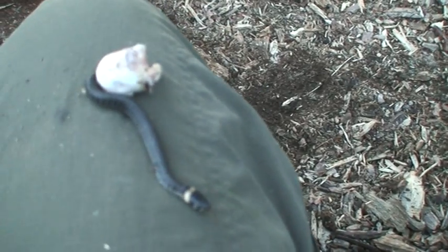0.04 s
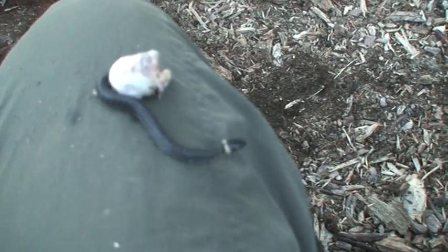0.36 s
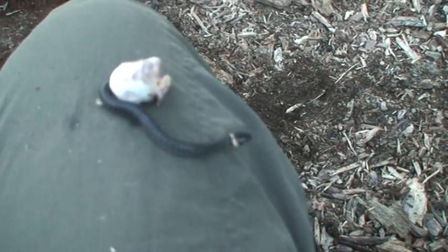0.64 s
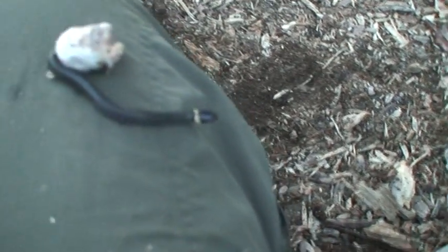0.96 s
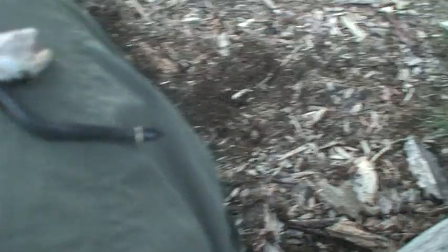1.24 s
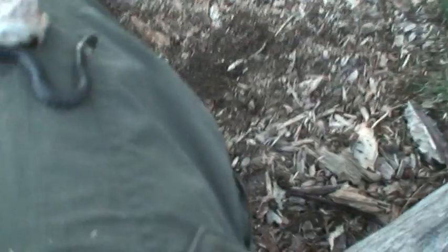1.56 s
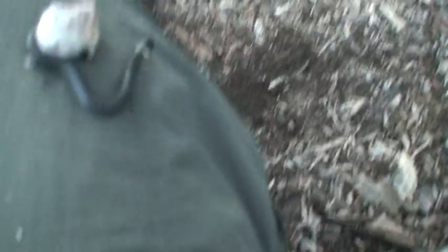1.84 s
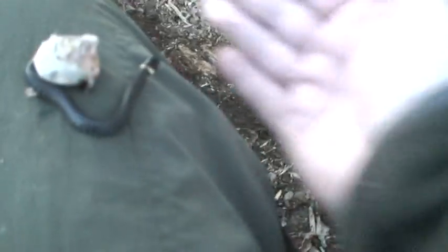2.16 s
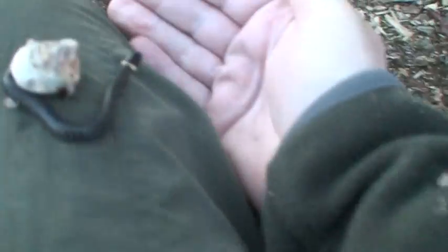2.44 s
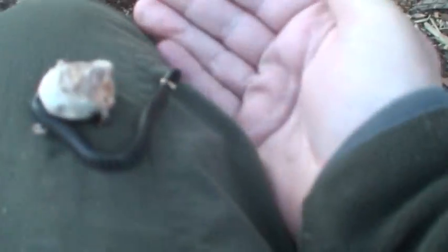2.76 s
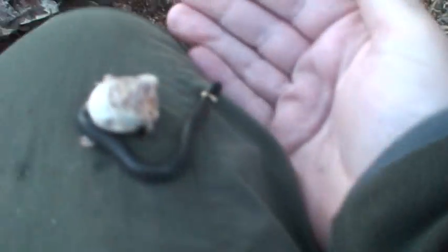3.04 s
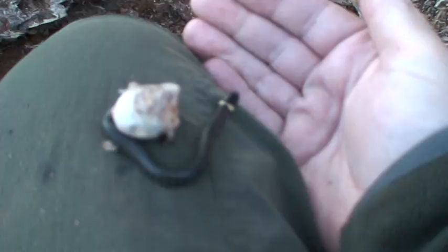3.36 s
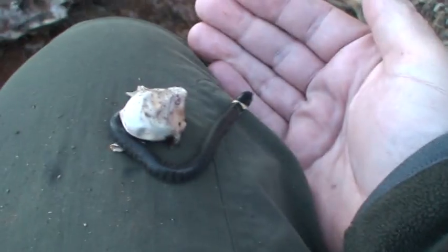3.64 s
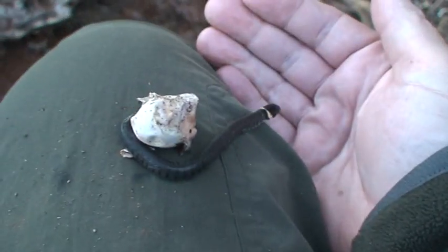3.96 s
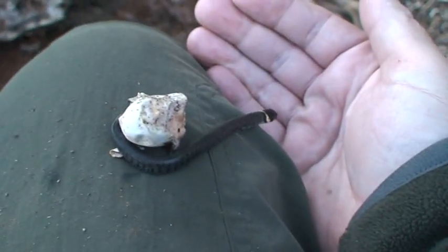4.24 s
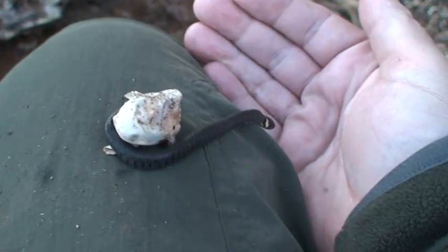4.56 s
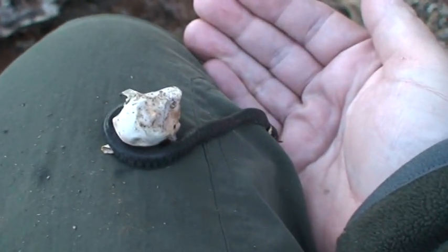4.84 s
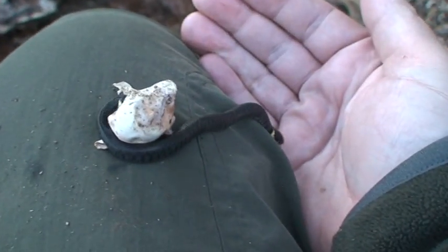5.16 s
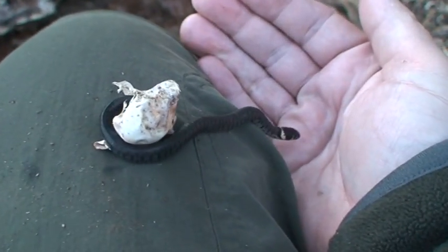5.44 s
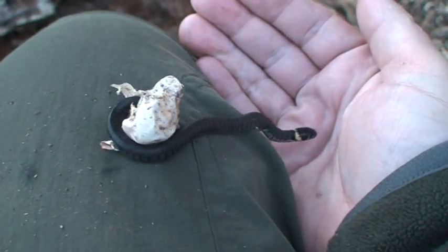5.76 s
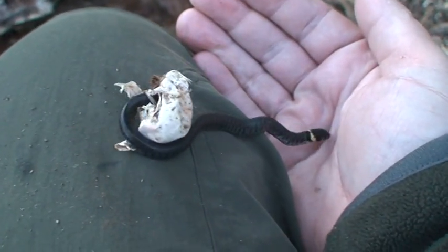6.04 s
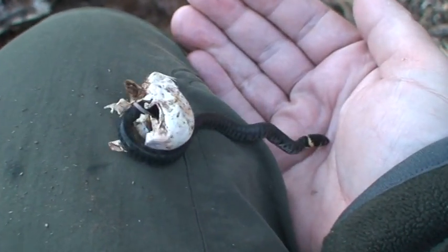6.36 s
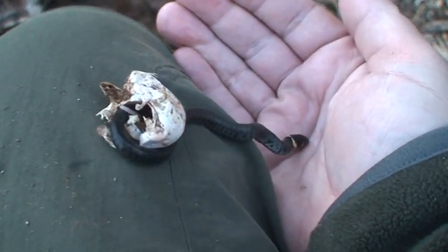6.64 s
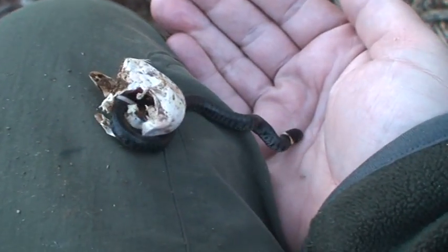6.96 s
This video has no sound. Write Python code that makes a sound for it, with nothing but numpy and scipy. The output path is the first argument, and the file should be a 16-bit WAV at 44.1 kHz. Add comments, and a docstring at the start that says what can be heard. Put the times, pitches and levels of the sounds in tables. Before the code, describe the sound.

A quiet outdoor background runs for all seven seconds: low, far traffic rumble, soft air and microphone hiss, and a small camera's own faint, thin tones. A distant machine whines on two wavering pitches, slowly sinking and fading. At about 1.5 seconds, fingers shift their grip on the camera, right at the microphone: a quick flurry of hollow plastic knocks, thuds and scrapes, with tiny bright crackles and cloth rubbing. The loudest knock comes at about 1.9 seconds. A few lighter taps and soft sleeve brushes trail on until around 2.6 seconds. At about 2.7 seconds the plastic housing gives one sharp, dry click, followed by a slight rub at 3 seconds. After that the background continues, the rumble swelling gently near 4 seconds and easing off. Two faint fabric brushes come at about 6.4 and 6.9 seconds as the whine dwindles.

```python
"""Outdoors, far traffic rumbles and a distant machine whines, slowly running down, under a small camera's
own thin tones and hiss. At 1.5 s someone shifts their grip on it: fingers knock and scrape, the plastic
housing thuds and rings, its seam crackles and a sleeve brushes past. At 2.7 s a panel snaps over with one
sharp click. The background carries on, the whine sinking and fading, with two faint brushes after 6 s."""
import sys
import numpy as np
from scipy import signal
from scipy.fft import rfft, irfft
from scipy.io import wavfile
from scipy.ndimage import uniform_filter1d

SR = 44100
rng = np.random.default_rng(int(sys.argv[2]) if len(sys.argv) > 2 else 0)


def store_pcm(level_fs):
    """Save levels as 16-bit WAV."""
    pcm = np.round(np.clip(level_fs, -1, 1) * 32767).astype(np.int16)
    wavfile.write(sys.argv[1], SR, np.atleast_2d(pcm).T)


N = 313551
TIME = np.arange(N) / SR
HIT_SIZE, LEAD_SIZE = 4096, 256  # samples in one hit, and in its pre-roll
HIT_TIME = np.arange(HIT_SIZE) / SR
HIT_HZ = np.maximum(np.fft.rfftfreq(HIT_SIZE, 1 / SR), 1)
HIT_GAIN = np.sqrt(SR / 100)  # a hit's level is its rms as if packed into 10 ms
LEFT_RIGHT = np.array([[.5], [-.5]])  # splits a pan or a delay between the two microphone ports

# Fingers on the housing. Each row: start in seconds, thud, ring, clack and tick levels in dB, ring pitch
# and clack centre in Hz, clack width in octaves, scrape decay in seconds, left minus right in dB.
KNOCKS = [(1.535, -39, -51, -61, -75, 614, 750, 0.76, 0.0013, -2),
          (1.5654, -37.5, -40, -43, -49, 576, 1500, 0.69, 0.0042, 1.5),
          (1.5805, -41, -35, -40.5, -53, 616, 1050, 0.81, 0.0013, -1),
          (1.623, -51, -58, -49, -62, 596, 1600, .3, 0.0042, 5),
          (1.644, -56, -47, -46.5, -68, 640, 1200, 0.67, 0.013, 1),
          (1.6629, -31, -27, -29, -38.5, 621, 1210, 0.44, .0003, -1),
          (1.674, -34.5, -57, -49, -57, 597, 1300, 0.64, 0.013, -1),
          (1.6982, -47, -48, -48, -70, 600, 1300, 0.37, 0.0009, -1),
          (1.7192, -58, -44, -47, -62, 606, 1400, 0.53, 0.0018, 6),
          (1.7332, -44, -40, -42.5, -56, 608, 1300, 0.58, .001, -2),
          (1.7404, -56, -54, -36.5, -48, 580, 2200, 0.18, 0.00032, -1),
          (1.7591, -32.5, -34.5, -34.5, -70, 608, 1000, 0.69, 0.00023, 2),
          (1.7915, -40, -36, -63, -75, 573, 800, .6, 0.0016, -8),
          (1.7963, -32, -37, -50, -75, 552, 750, .5, .001, -1),
          (1.8193, -47, -30.5, -43, -54, 555, 990, 0.53, 0.0011, -6),
          (1.8314, -45, -37.5, -36.5, -41, 594, 2100, 0.46, 0.00036, 3),
          (1.846, -37, -37, -37, -52, 577, 880, 0.68, 0.0025, -1),
          (1.863, -45, -41, -51, -74, 590, 1500, 0.57, 0.0033, -4),
          (1.8805, -43, -39, -38.5, -61, 590, 1400, 0.77, 0.0056, 4),
          (1.8923, -20, -25.5, -25.5, -44, 568, 1050, 0.71, 0.00036, -2.5),
          (1.9084, -41, -25.5, -40, -62, 573, 1250, 0.67, 0.0017, -4),
          (1.926, -38, -45, -36.5, -60, 607, 1440, 0.72, 0.0037, 2),
          (2.016, -45, -46, -44.5, -58, 580, 1200, 0.79, 0.0025, 2),
          (2.044, -50, -41, -48, -59, 582, 1300, 0.87, .007, 1),
          (2.1635, -58, -45, -49.5, -72, 630, 870, 0.64, 0.00043, 0),
          (2.4685, -63, -42, -48.5, -65, 584, 1200, 1.13, 0.0011, -3),
          (2.497, -57, -58, -60, -76, 595, 1980, 0.54, 0.001, 0)]
# The panels' clack. Each row: mode pitch in Hz, time to fall 60 dB in seconds, relative level in dB.
HOUSING_MODES = [(816, 0.034, 5.5), (855, 0.052, 5.5), (1014, 0.017, 9.5), (1096, .035, 1.5),
                 (1412, 0.051, 2.5), (1550, 0.015, 0), (1780, 0.062, 3), (1900, 0.026, 2), (2250, 0.018, 1),
                 (2390, 0.031, -8), (2790, 0.03, 6.5), (2960, 0.02, -2), (3830, 0.026, 11)]
# The fingertip's tick. Each row: frequency in Hz, relative level in dB.
TICK_EQ = [(2200, 7.5), (3800, -2), (4700, -9), (5500, 1), (6650, -11), (8400, -12), (9500, -20),
           (12000, -27), (16000, -37)]
# The click's attack. Each row: frequency in Hz, relative level in dB.
SNAP_EQ = [(400, -17), (800, -12), (1080, 5), (1400, 6.5), (2100, 1), (2800, -5), (4600, -5), (5400, -19),
           (6500, -36), (7200, -6), (8200, -14), (9100, -38), (10500, -33), (16000, -45)]
# The click's ring. Each row: mode pitch in Hz, time to fall 60 dB in seconds, relative level in dB.
CLICK_MODES = [(261, .05, -10), (564, 0.06, 2), (800, 0.065, -9), (1100, 0.049, 2), (1360, 0.039, 0),
               (1550, .032, -6), (1710, 0.049, 0), (1857, 0.036, -6), (2240, .03, 1), (2400, 0.037, -9),
               (3130, 0.021, -9)]
# The click's dry rattle. Each row: frequency in Hz, relative level in dB.
CHATTER_EQ = [(500, -1), (1000, 6), (2200, -1), (3200, -4), (5200, -19), (6500, -30), (7900, -23),
              (9500, -33), (16000, -45)]
# The seam under the hardest presses. Each row: start in seconds, level in dB, decay in seconds.
SEAM_CRACKS = [(1.5666, -54, .004), (1.6636, -43.5, 0.0012), (1.7341, -56, .002), (1.7403, -54, .0015),
               (1.8188, -56, .0018), (1.8323, -41.5, 0.0013), (1.8812, -60, .0015), (1.892, -48, 0.0014),
               (1.929, -54, 0.0028)]
# The seam's bright grit. Each row: frequency in Hz, relative level in dB.
SEAM_EQ = [(1800, 5), (3000, 1), (4000, 8), (4900, 6), (6300, -4), (8000, 0), (9800, -11), (12000, -19),
           (16000, -24)]
# Strokes of cloth and skin. Each row: peak time and length in seconds, rub and thread hiss levels in dB.
BRUSHES = [(1.579, 0.054, -49.5, -66.5), (1.645, 0.054, -58.5, -73), (1.679, 0.028, -51, -67),
           (1.734, .02, -56, -68), (1.828, 0.11, -56.5, -72), (1.9, 0.045, -58, -75),
           (2.29, 0.035, -57, -63), (2.337, 0.1, -61, -71), (2.487, 0.16, -61, -73), (2.615, 0.1, -62, -74),
           (2.98, 0.12, -64, -70.5), (6.353, .045, -62.5, -73), (6.907, .09, -69, -79)]
# The body of the rub. Each row: frequency in Hz, relative level in dB.
CLOTH_EQ = [(400, -27), (900, 8), (1800, 7.5), (3500, 0), (5000, -6.5), (6500, -11), (9000, -23),
            (16000, -32)]
# The threads' sizzle. Each row: frequency in Hz, relative level in dB.
THREAD_EQ = [(4000, -12), (7000, -6), (8200, 5), (9400, 2.5), (10700, -4), (12500, -3), (16000, -18)]
# Swells of a low rumble, the biggest near 4 s. Each row: time in seconds, level before its trim in dB.
RUMBLE_LEVELS = [(0.0, -46), (1.2, -51.5), (2.3, -49.5), (2.6, -52), (3.2, -47), (3.4, -49.5), (4.1, -44),
                 (4.8, -52), (5.1, -49.5), (6.5, -54), (7.1, -52)]
# The rumble's weight. Each row: frequency in Hz, relative level in dB.
RUMBLE_EQ = [(30, -32), (70, -5.5), (120, 0.5), (175, -0.5), (240, -5), (320, -14), (500, -21.5)]
# Far tyre wash. Each row: frequency in Hz, relative level in dB.
TYRE_EQ = [(200, -3.5), (310, -10.5), (420, -2.5), (530, -4.5), (620, -0.5), (730, -15.5), (1000, -18),
           (1600, -31)]
# The machine's upper whine, carried over on moving air. Each row: time in seconds, level in dB.
UPPER_WHINE_LEVELS = [(0, -49.5), (0.17, -46), (0.58, -59.5), (0.78, -53.5), (0.98, -61.5), (1.3, -53.5),
                      (2.2, -50.5), (2.38, -54), (2.52, -52), (2.9, -55.5), (3.25, -53.5), (3.5, -58.5),
                      (4.02, -61.5), (4.22, -55), (4.92, -55), (5.2, -60), (6.28, -60.5), (7.1, -67.5)]
# Its lower whine. Each row: time in seconds, level in dB.
LOWER_WHINE_LEVELS = [(0, -52.5), (0.5, -66.5), (0.82, -56.5), (1, -62.5), (1.35, -57.5), (2.1, -62),
                      (2.35, -54), (2.75, -70), (3, -63), (3.4, -69), (4.6, -72.5), (5, -58.5), (5.5, -78),
                      (7.1, -75)]
# The bed of air and microphone hiss. Each row: frequency in Hz, relative level in dB.
AIR_EQ = [(15, -17), (30, 0), (70, 6), (130, -13), (350, -11), (700, -12.5), (1000, -16), (1500, -21),
          (2200, -23.5), (3000, -30), (6000, -35.5), (9800, -39.5), (12500, -37.5), (16000, -42.5)]
# The camera's own whistle. Each row: pitch in Hz, level in dB.
CAMERA_TONES = [(393, -66), (1211, -67), (2385, -81.5)]
# Stereo width of the sound. Each row: frequency in Hz, side minus mid in dB.
STEREO_WIDTH = [(30, -22), (80, -28), (200, -21), (380, -13), (700, -8), (1300, -2.5), (2400, -2.5),
                (8000, -2), (11000, -6), (13000, -39)]


def knock(thud_db, ring_db, clack_db, tick_db, ring_hz, clack_hz, octaves, scrape_s, pan_db,
          thud_hz=260, thud_t60_s=0.055, ring_t60_s=0.052, slip_s=0.001, port_lag_s=.00009):
    """One touch: the finger catches and slips, the housing thuds, rings and clacks, the contact ticks."""
    # the longer the scrape, the more of the push comes as tiny slips after the first catch
    slips = unit_power(rfft(rng.standard_normal(HIT_SIZE) ** 3 * np.exp(-HIT_TIME / scrape_s)))
    push = 1 + scrape_s / slip_s * slips
    thud = body_mode(thud_hz, thud_t60_s)
    ring = body_mode(ring_hz, ring_t60_s)
    # the place of contact picks a band of the panels and favours some of their modes
    band = 1 / (1 + (np.log2(HIT_HZ / clack_hz) / octaves / 2) ** 2) ** 4
    panels = panel_ring(HOUSING_MODES, scatter_db=5.5)
    # a first wave runs ahead of the ringing and reaches one port before the other
    first_wave = port_delay(port_lag_s * rng.uniform(-1.28, 1))
    clack = unit_power(band * panels) + 0.73 * unit_power(band * first_wave)
    # the tick is one sharp snap with a duller, gritty tail
    tail = burst(decay_s=0.0027) / (1 + (HIT_HZ / 13000) ** 2)
    tick_eq = eq(TICK_EQ)
    tick = unit_power(first_wave * tick_eq) + undb(3) * unit_power(tail * tick_eq)
    chirp = panel_chirp(spread_s=0.001824)
    layers = ((thud_db, thud), (ring_db, ring), (clack_db, clack * chirp), (tick_db, tick * chirp))
    spectrum = sum(undb(db) * unit_power(push * layer) for db, layer in layers)
    fades = signal.windows.tukey(HIT_SIZE, LEAD_SIZE / HIT_SIZE)
    return hit_wave(spectrum) * fades * undb(pan_db * LEFT_RIGHT)


def fingers():
    """The grip shifts in a quick flurry of knocks on the housing."""
    return sum(place(knock(*touch), start_s) for start_s, *touch in KNOCKS)


def panel_click(start_s=2.7468, snap_db=-30.5, ring_db=-30.5, chatter_db=-35.5,
                lag_s=0.000211, lag_above_hz=2530):
    """A stressed panel snaps over, chatters dryly against its seat and rings briefly."""
    treble = HIT_HZ ** 4 / (HIT_HZ ** 4 + lag_above_hz ** 4)
    snap = unit_power(eq(SNAP_EQ) * port_delay(lag_s * treble))  # the top end hits the right port first
    ring = unit_power(panel_ring(CLICK_MODES))
    chatter = unit_power(burst(decay_s=0.006) * eq(CHATTER_EQ))
    click = undb(snap_db) * snap + undb(ring_db) * ring + undb(chatter_db) * chatter
    return place(hit_wave(click * panel_chirp(spread_s=0.00204)), start_s)


def seam_crackle(grit_power=1.6):
    """Tiny slips along the seam make bright bursts that die within milliseconds."""
    out = np.zeros((2, N))
    for start_s, db, decay_s in SEAM_CRACKS:
        white = rng.standard_normal((2, HIT_SIZE))
        slips = np.sign(white) * abs(white) ** grit_power * np.exp(-HIT_TIME / decay_s)
        mid, side = unit_power(rfft(slips))
        crack = unit_power(stereo(mid, side, HIT_SIZE) * eq(SEAM_EQ))
        out += undb(db) * place(hit_wave(crack), start_s)
    return out


def mode(hz, t60_s, port_turn=0.77):
    """Spectrum of one fading mode; its phase tends to differ more between the ports the higher it is."""
    phase = port_turn * rng.standard_normal((2, 1)) * hz / 1000
    decay = np.exp(-np.log(1000) * HIT_TIME / t60_s)
    return unit_power(rfft(np.sin(2 * np.pi * hz * HIT_TIME + phase) * decay))


def body_mode(hz, t60_s, q=0.8):
    """The whole body's thud or hollow ring: one mode, band-passed around its own pitch."""
    return mode(hz, t60_s) / (1 + 1j * q * (HIT_HZ / hz - hz / HIT_HZ))


def panel_ring(modes, scatter_db=0):
    """Panel modes ring together in alternating polarity, with optional random scatter in level."""
    shares = undb(scatter_db * rng.standard_normal(len(modes))) if scatter_db else np.ones(len(modes))
    return sum((-1) ** k * shares[k] * undb(db) * mode(hz, t60) for k, (hz, t60, db) in enumerate(modes))


def panel_chirp(spread_s):
    """Low bending waves travel slower through a panel, turning each click into a tiny falling chirp."""
    return np.exp(-4j * np.pi * spread_s * np.sqrt(1000 * HIT_HZ))


def sleeve(grain_db=2.0, rise_share=0.7):
    """Cloth and skin slide in soft strokes, quick in and slower out; threads catch unevenly and hiss."""
    rub, hiss = 0, 0
    for peak_s, length_s, rub_db, hiss_db in BRUSHES:
        span_s = length_s * np.where(TIME < peak_s, rise_share, 2 - rise_share)
        stroke = np.exp(-(2 * (TIME - peak_s) / span_s) ** 2)
        rub += undb(rub_db) * stroke
        hiss += undb(hiss_db) * stroke
    brushing = rub * noise(CLOTH_EQ) + hiss * noise(THREAD_EQ)
    return brushing * unit_rms(undb(grain_db * wander(300)))


def traffic(rumble_trim_db=0.15, wash_db=-57, wash_follow=0.8, flutter_db=1.22):
    """A low rumble rises and falls; far tyre wash rides the same swells of air as the upper whine."""
    rumble_db = rumble_trim_db + fader(RUMBLE_LEVELS)
    whine_db = fader(UPPER_WHINE_LEVELS)
    swell_db = wash_follow * (whine_db - whine_db.mean())
    rumble = noise(RUMBLE_EQ) * undb(rumble_db + flutter_db * wander(9))
    wash = noise(TYRE_EQ) * undb(wash_db + swell_db + flutter_db * wander(7.7))
    return rumble + wash


def machine(start_hz=630.2, idle_hz=558.5, run_down_s=8.1, lower_ratio=.864):
    """Two far whines coast down together; moving air makes them waver and fade, blurring the lower one."""
    pitch_hz = idle_hz + (start_hz - idle_hz) * np.exp(-TIME / run_down_s)
    upper = tone(pitch_hz, waver_hz=1.22, rate_hz=60)
    upper *= undb(fader(UPPER_WHINE_LEVELS) + 2.5 * wander(14))
    lower = tone(lower_ratio * pitch_hz, waver_hz=6.0, rate_hz=60)
    lower *= undb(fader(LOWER_WHINE_LEVELS) + 3.0 * wander(14))
    return upper + lower


def air(level_db=-54.0):
    """A steady bed of outdoor air and microphone hiss."""
    return undb(level_db) * noise(AIR_EQ)


def camera_tones():
    """Thin, steady tones from inside the camera."""
    return sum(undb(db) * tone(hz, waver_hz=0.632, rate_hz=20) for hz, db in CAMERA_TONES)


def tone(hz, waver_hz, rate_hz):
    """A sine at rms 1 whose pitch wavers at random."""
    return unit_rms(np.sin(2 * np.pi * np.cumsum(hz + waver_hz * wander(rate_hz)) / SR))


def noise(points):
    """Steady stereo noise at rms 1, shaped by an EQ curve."""
    mid, side = rfft(rng.standard_normal((2, N)))
    return unit_rms(irfft(stereo(mid, side, N) * eq(points, N), N))


def burst(decay_s):
    """Spectrum of a dying puff of stereo white noise."""
    return rfft(rng.standard_normal((2, HIT_SIZE)) * np.exp(-HIT_TIME / decay_s))


def stereo(mid, side, size):
    """Left and right spectra: near mono in the bass, wide from 1 to 10 kHz, mono at the very top."""
    side = side * eq(STEREO_WIDTH, size)
    return np.array([mid + side, mid - side])


def port_delay(lag_s):
    """Phase shifts that put the left port behind the right by lag_s."""
    return np.exp(-2j * np.pi * HIT_HZ * lag_s * LEFT_RIGHT)


def hit_wave(spectrum):
    """Turn a hit's spectrum into a waveform with a short pre-roll."""
    return np.roll(irfft(spectrum), LEAD_SIZE, axis=1) * HIT_GAIN


def place(wave, start_s):
    """Lay a hit on a silent track with its attack at start_s."""
    track = np.zeros((2, N))
    start = int(start_s * SR) - LEAD_SIZE
    track[:, start:start + HIT_SIZE] = wave
    return track


def eq(points, size=HIT_SIZE):
    """Gain of an EQ curve at each Fourier bin, rolling off beyond its end points."""
    hz, db = np.transpose(points)
    bins = np.maximum(np.fft.rfftfreq(size, 1 / SR), 1)
    skirts = np.minimum(bins / hz[0], 1) ** 2 * np.minimum(hz[-1] / bins, 1) ** 2
    return undb(np.interp(np.log(bins), np.log(hz), db)) * skirts


def fader(points):
    """A fader ride in dB, one value a sample."""
    return np.interp(TIME, *np.transpose(points))


def wander(rate_hz):
    """Smooth random drift at rms 1."""
    hold = int(SR / rate_hz)
    steps = np.repeat(rng.standard_normal(N // hold + 1), hold)
    return unit_rms(uniform_filter1d(uniform_filter1d(steps, hold), hold)[:N])


def undb(db):
    """Decibels to gain."""
    return 10 ** (np.asarray(db) / 20)


def unit_rms(x):
    """Scale to rms 1."""
    return x / np.sqrt(np.mean(x ** 2))


def unit_power(spectrum):
    """Scale a spectrum to mean power 1 in each channel."""
    return spectrum / np.sqrt(np.mean(abs(spectrum) ** 2, axis=-1, keepdims=True))


def scene(pan_db=-0.5):
    """Close handling in front of a quiet outdoor bed that leans slightly right."""
    background = (traffic() + air() + machine() + camera_tones()) * undb(pan_db * LEFT_RIGHT)
    return fingers() + seam_crackle() + panel_click() + sleeve() + background


def record(dry):
    """The camera cuts the treble steeply above 16.5 kHz."""
    return signal.sosfilt(signal.ellip(8, .2, 70, 16500, fs=SR, output="sos"), dry)


dry = scene()
out = record(dry)
store_pcm(out)
```